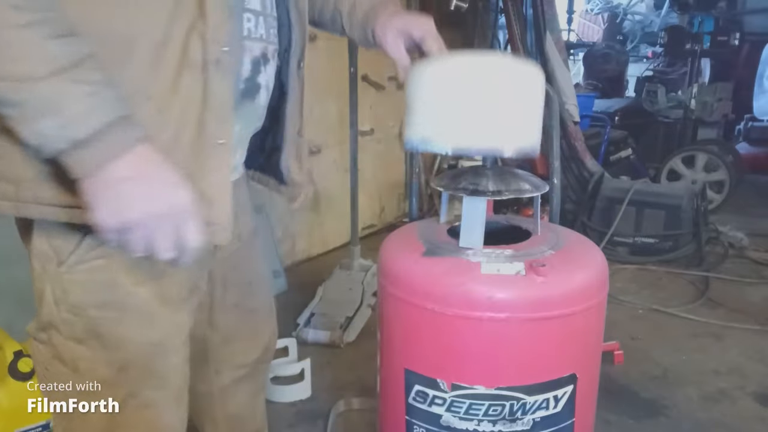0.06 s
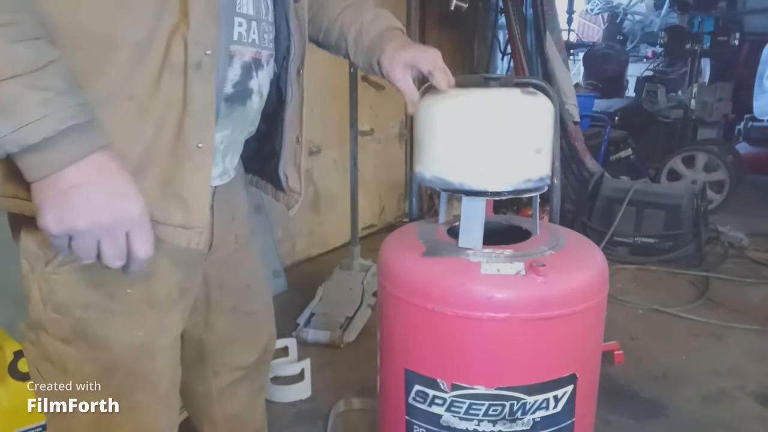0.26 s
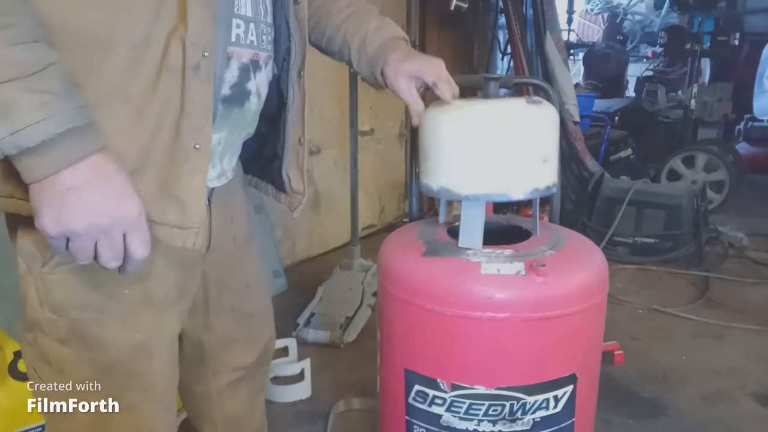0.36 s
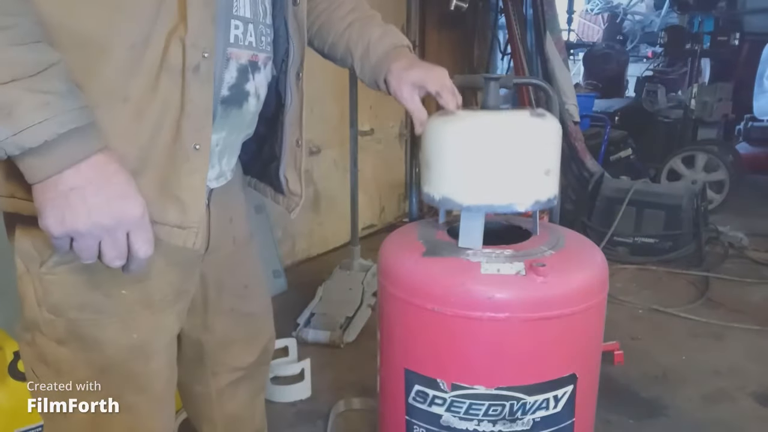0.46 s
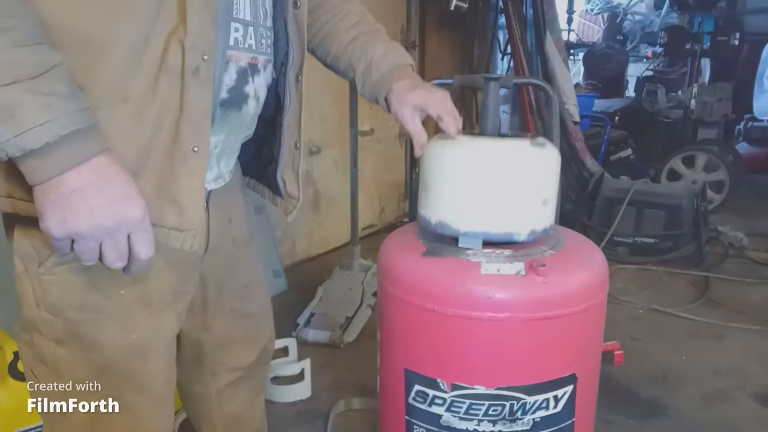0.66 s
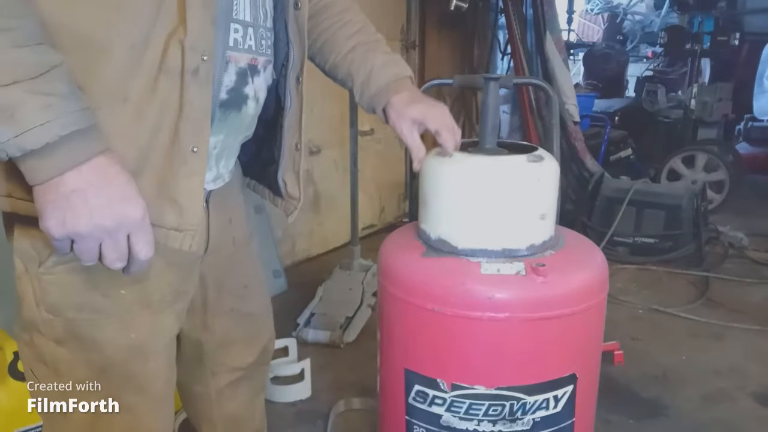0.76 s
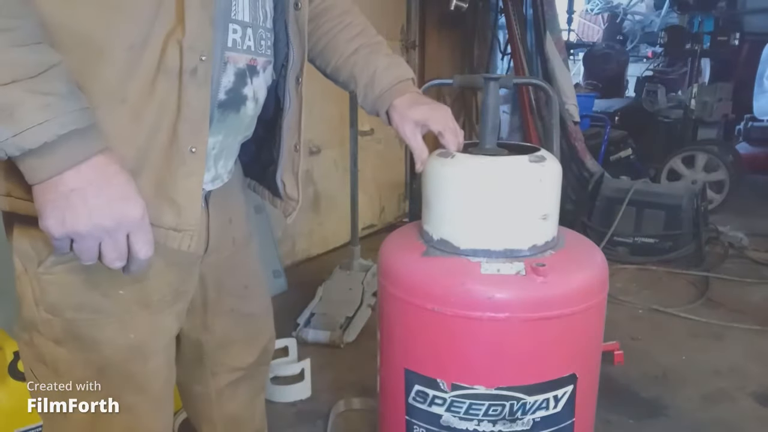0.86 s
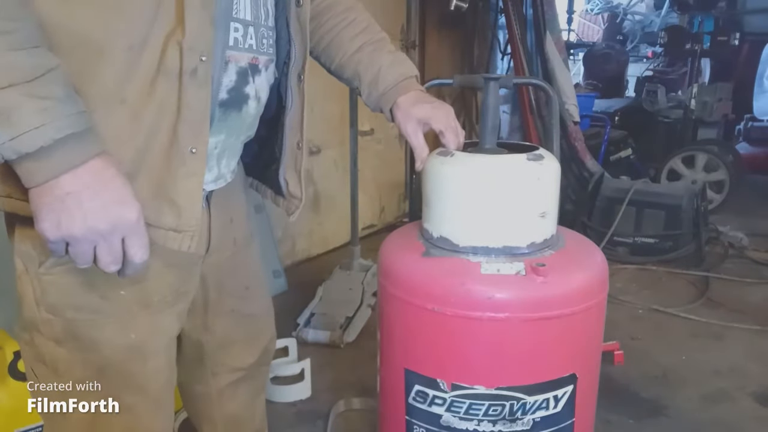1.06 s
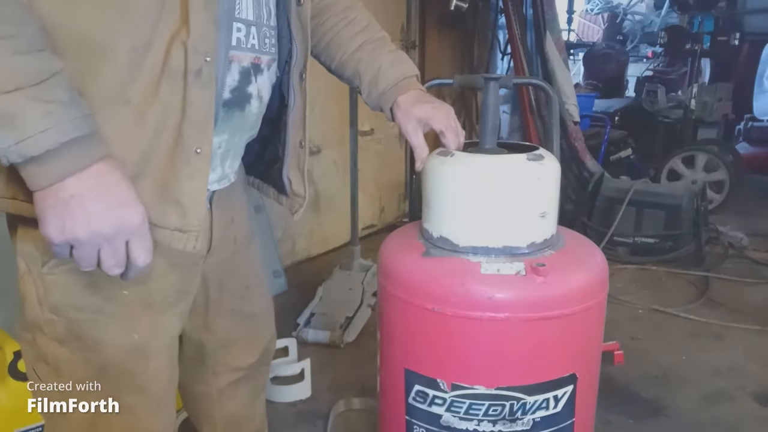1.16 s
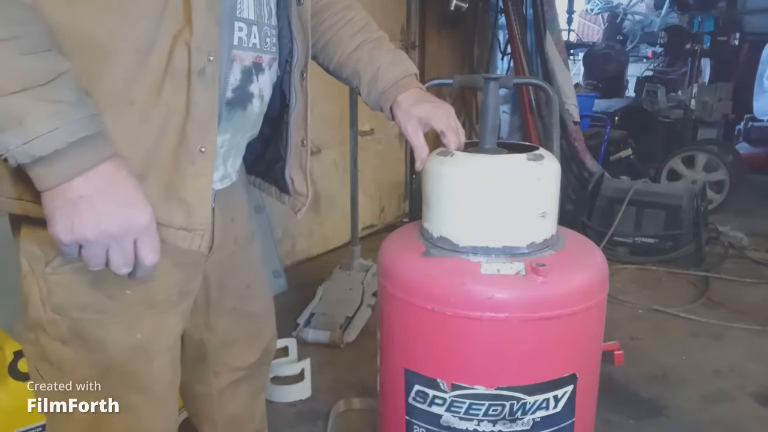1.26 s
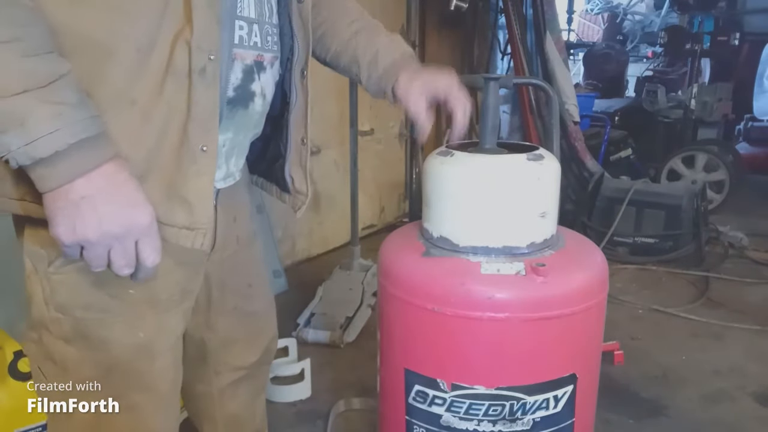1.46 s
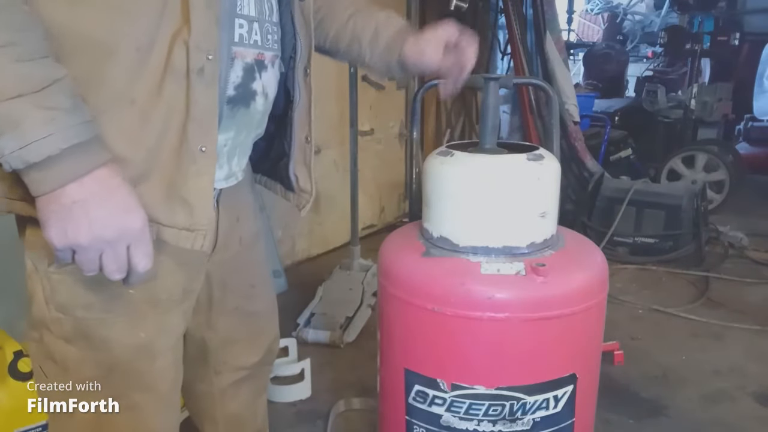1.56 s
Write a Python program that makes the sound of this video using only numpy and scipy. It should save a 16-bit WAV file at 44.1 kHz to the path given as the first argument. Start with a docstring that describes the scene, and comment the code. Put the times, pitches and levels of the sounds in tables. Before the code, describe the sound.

Loud clanging of a thin metal cover knocked on a frame and set down on a steel tank

```python
"""Sheet-metal cover set down on a steel tank

In a garage a cover clanks against the frame and rings on, then lands on the tank, rocks, scrapes and settles;
fingers brush it as they leave. Blows ring damped sines, noise shimmer and faint close modes; the tank adds low
modes and dull thuds, the rim bright noise. Under them lie a brief hum and garage hiss. A limiter holds clanks down.
"""
import sys
import numpy as np
from scipy import signal
from scipy.fft import rfft, irfft, next_fast_len
from scipy.io import wavfile
from scipy.ndimage import uniform_filter1d, minimum_filter1d

SR = 44100
rng = np.random.default_rng(int(sys.argv[2]) if len(sys.argv) > 2 else 0)


def transcribe(u):
    """Save the signal u as a 16-bit wav file named by the first command-line argument.

    u: samples, shape (n,) or (channels, n), limited to [-1, 1]; the rate is SR.
    q: integer samples, one column per channel.
    """
    v = np.clip(np.atleast_2d(u).T, -1, 1)
    q = np.round(v * 32767).astype(np.int16)
    wavfile.write(sys.argv[1], SR, q)


N = 70560
TIME = np.arange(N) / SR  # s

# Garage hiss, spectrum shape: pitch_hz, density_db (per Hz, relative)
GARAGE_SPECTRUM = [(40, -42), (150, -13), (400, -2.5), (1000, -2), (2000, -8), (4000, -8), (8000, -20),
                   (16000, -18.5)]
GARAGE_DB = -72  # rms

# Soft low partials: pitch_hz, level_db (peak, before the fade)
HUM_PARTIALS = [(76, -59), (152, -65)]
HUM_START_S, HUM_END_S, HUM_FADE_DB_PER_S = .275, .64, 32

# Dull bumps through the tank: start_s, level_db (before the envelope)
THUDS = [(0.237, -56.5), (0.827, -40.5), (.91, -65), (1.0, -45.5), (1.129, -44.5)]
THUD_HZ, THUD_T60_S = 164.3, 0.066

# Tank modes: pitch_hz
TANK_HZ = [287, 394, 468, 501, 545, 593, 614, 621, 632, 847]
# The same modes: level_db (relative), t60_s
TANK_MODES = [(-4, 0.71), (-34.5, 6.5), (-28, 4.8), (-19.5, 6), (-15, 0.12), (-12, 2.5), (-5, 2.5),
              (-1.5, 0.6), (0.5, 0.85), (-17, 2.25)]

# Fingers brushing the cover: start_s, length_s, tones_db, hiss_db
BRUSHES = [(1.306, 0.031, -71, -63.5), (1.414, 0.14, -53, -67.5)]
# Thin tones they wake: pitch_hz
THIN_HZ = [3219, 3601, 3978, 4204, 4576, 4727, 4899, 5087, 5313, 5895, 6977, 7434, 10691, 11687]
# The same tones: level_db (relative), t60_s
THIN_MODES = [(-3, 0.83), (-5, 0.39), (8, 0.31), (2.5, 1.1), (0, 0.55), (0, .4), (7, 0.18), (0, .4),
              (-16, .4), (5, 0.17), (-5, .3), (-4, .3), (-5, 0.35), (-15, .3)]

# Bright chatter of rim on steel: time_s, level_db
SCRAPE_LEVEL = [(.233, -61), (0.237, -20.5), (0.249, -22), (0.26, -48.5), (.28, -27), (.33, -39),
                (.385, -50.5), (.42, -80), (0.825, -96.5), (.828, -40), (.87, -52), (.9, -68.5),
                (0.919, -26.5), (0.969, -39), (1.0, -42), (1.04, -43.5), (1.081, -38), (1.115, -41.5),
                (1.146, -48.5), (1.19, -57.5), (1.22, -64)]
# Its spectrum shape: pitch_hz, density_db (per Hz, relative)
GRIT_SPECTRUM = [(2940, -11.5), (5000, 10), (7380, -3), (8620, -4.5), (15200, -5.5), (16000, -16.5)]
GRIT_WIDTH_HZ, GRIT_SCATTER_DB = 60, 6  # spacing and spread of the random peaks

# Knocks on the frame while the cover hangs in the hand: start_s, level_db
KNOCKS = [(.2345, -19), (.241, -18), (.2687, -19.5), (.293, -16), (.3211, -22), (.358, -38.5), (.395, -37)]
# Contacts as it lands and rocks: start_s, level_db, tank_level_db
LANDINGS = [(.8258, -18, -28.5), (.838, -19, -70), (.8758, -17.5, -42), (.905, -11.5, -15.5),
            (.955, -19.5, -33), (.98, -31, -47), (1.03, -26, -29.5), (1.08, -36.5, -26.5),
            (1.112, -37.5, -60), (1.14, -40.5, -37.5), (1.175, -49, -39), (1.197, -62, -30)]
REBOUND_DB = -6  # main modes in every blow after the first
CONTACT_T60_S, ATTACK_S, SWELL_S = 0.016, 0.00045, 0.0011  # rough push; rise constants of modes and shimmer

# Cover and frame ringing free: pitch_hz
HANGING_HZ = [398, 511, 594, 615, 739, 768, 846, 947, 996, 1027, 1167, 1351, 1393, 1448, 1674, 1997, 2083,
              2271, 2654, 2893, 2941, 3025, 3205, 3425, 3531, 3732, 3894, 4544, 5136, 5760, 6875]
# The same modes: level_db (relative to the blow), t60_s
HANGING_MODES = [(-13.5, 3.4), (-25.5, 2.4), (-2.5, 1.37), (-8, 1.264), (-17, 3), (-12.5, 1.51), (-19, 4.4),
                 (0, 0.18), (7, 0.2), (-11, 0.67), (-12.5, 2.03), (-15.5, 1), (-5.5, 1.1), (-15.5, 0.78),
                 (-12.5, 1.23), (-13.5, 0.86), (-26.5, .25), (-13, 4.4), (-2.5, 0.34), (0, 0.44),
                 (-19, 3.25), (4.5, .4), (-7, 0.71), (-18, 1.17), (-36.5, 0.2), (-15.5, .4), (0.5, 0.66),
                 (-0.5, 0.33), (-25.5, 1.2), (-9, 0.28), (-12, 0.12)]
# Cover resting on its seat: pitch_hz
SEATED_HZ = [678, 770, 877, 1017, 1081, 1139, 1174, 1277, 1335, 1395, 1459, 1674, 1707, 1752, 1830, 2019,
             2268, 2652, 2880, 2941, 3203, 3418, 3596, 3908, 4134, 4285, 5050, 5566]
# The same modes: level_db (relative to the blow), t60_s
SEATED_MODES = [(-22, 0.71), (2, 1.3), (-11, 0.77), (-40, 3.3), (1, 0.25), (-10.5, 0.93), (-16.5, 1.23),
                (-10.5, 0.98), (-18.5, 2.15), (-12, 0.2), (-12, 1.2), (-19, 2.9), (-4, 0.9), (-19, 0.21),
                (-20, 1.5), (-11.5, 0.84), (-8, 0.87), (-8, 0.62), (-14.5, 0.6), (-3.5, 0.31), (-13, 0.95),
                (-19, 0.29), (-21.5, 0.9), (-24, 0.35), (-26, 0.15), (-13.5, 0.53), (-13, 0.1), (-31, 0.1)]
SEATED_STOP_T60_S = 0.083  # how fast the free ring dies once the cover has landed

# Crowd of close sheet modes, hanging free: pitch_hz, density_db (per Hz, relative)
SHEET_FREE = [(88, -66), (150, -10), (514, -9), (601, 3), (941, -1.5), (1560, -2), (2980, -3.5), (3490, 5),
              (3770, 1.5), (16000, -45)]
# The same, seated: pitch_hz, density_db (per Hz, relative)
SHEET_SEATED = [(88, -32), (150, -14.5), (774, 2), (1420, -3.5), (1560, -9), (1760, -1), (2760, -6),
                (3620, -0.5), (8560, -33), (16000, -53.5)]
# Shimmer decay, hanging free: pitch_hz, t60_s
FREE_T60 = [(200, 0.1), (600, .7), (2000, 0.5), (5000, 0.36), (9000, 0.24), (15000, 0.45)]
# Shimmer decay, seated: pitch_hz, t60_s
SEATED_T60 = [(200, 0.65), (450, 0.64), (900, 0.88), (2000, 0.57), (5000, 0.53), (9000, 0.22),
              (15000, 0.11)]
SHEET_FREE_DB, SHEET_SEATED_DB = 2.5, 1.5  # shimmer, relative to the blow
SHEET_WIDTH_HZ, SHEET_SCATTER_DB = 35, 4  # spacing and spread of its random peaks
CROWD_FREE_DB, CROWD_SEATED_DB, CROWD_SCATTER_DB = 9, 0.5, 6.5  # faint close modes
CROWD_LIFE = 0.57  # t60 of the faint modes over that of the shimmer

# Tones already lingering at the start: pitch_hz, level_db (rms, 1/7 s before the start)
LINGER = [(393, -78), (629.8, -64), (888, -85), (1163, -83), (1674, -63), (2272, -71), (2939, -67),
          (3898, -90)]
LINGER_T60_S = 20

LOW_CUT_HZ, TOP_HZ = 302, 16450
LIMIT_DB, RELEASE_DB_PER_S, LOOK_AHEAD_S = -5.5, 51, .002


def amp(db):
    """Decibels to linear gain."""
    return 10 ** (np.asarray(db) / 20)


def unit(x):
    """x scaled to rms 1."""
    return x / np.sqrt(np.mean(x ** 2) + 1e-20)


def along(points, hz):
    """Value at hz between (Hz, value) points on a log pitch axis."""
    f, v = np.transpose(points)
    return np.interp(np.log(hz + 1), np.log(f + 1), v)


def filtered(x, response):
    """x times a response of frequency."""
    m = next_fast_len(N + SR // 2)  # padding for the filter's tail
    return irfft(rfft(x, m) * response(np.fft.rfftfreq(m, 1 / SR)), m)[:N]


def hiss(spectrum):
    """Coloured noise of rms 1."""
    return unit(filtered(rng.standard_normal(N), lambda hz: amp(along(spectrum, hz))))


def uneven(x, width_hz, scatter_db):
    """x through narrow random peaks and dips, drawn anew each time, rms 1."""
    knots = scatter_db * rng.standard_normal(1000)
    return unit(filtered(x, lambda hz: amp(np.interp(hz / width_hz, np.arange(1000), knots))))


def fade(t, t60):
    """Exponential decay, 60 dB down after t60 seconds."""
    return amp(-60 * t / np.maximum(t60, .002))


def table(hz, rest):
    """Pitches joined with their levels and decays."""
    return np.column_stack([hz, rest])


def ring(modes, t):
    """Damped sines starting together with a soft attack."""
    hz, db, t60 = np.transpose(modes)[..., None]
    tones = amp(db) * fade(t, t60) * np.sin(2 * np.pi * hz * t)
    return (1 - np.exp(-t / ATTACK_S)) * np.sum(tones, axis=0)


def add_at(out, start_s, sound):
    """Mixes sound into the double-length out from start_s."""
    out[round(start_s * SR):][:N] += sound


def garage():
    """Steady coloured hiss of the garage."""
    return amp(GARAGE_DB) * hiss(GARAGE_SPECTRUM)


def hum():
    """Two soft low partials that swell, fade and stop."""
    on = 1.0 * (TIME > HUM_START_S) * (TIME < HUM_END_S)
    gate = uniform_filter1d(on, size=SR // 15)
    falling = amp(-HUM_FADE_DB_PER_S * (TIME - HUM_START_S))
    return gate * falling * sum(amp(db) * np.sin(2 * np.pi * hz * TIME) for hz, db in HUM_PARTIALS)


def thuds():
    """Short low pushes: one quickly rising, quickly damped sine each."""
    out = np.zeros(N)
    for start_s, db in THUDS:
        t = np.maximum(TIME - start_s, 0)
        envelope = (1 - fade(t, THUD_T60_S / 3)) * fade(t, THUD_T60_S)
        out += amp(db) * envelope * np.sin(2 * np.pi * THUD_HZ * t)
    return out


def tank():
    """The landings pass into the tank's long low modes."""
    out, tones = np.zeros(2 * N), ring(table(TANK_HZ, TANK_MODES), TIME)
    for start_s, _, tank_db in LANDINGS:
        add_at(out, start_s, amp(tank_db) * tones)
    return out[:N]


def grit():
    """Bright noise with narrow random peaks and dips, drawn anew each time."""
    return uneven(hiss(GRIT_SPECTRUM), GRIT_WIDTH_HZ, GRIT_SCATTER_DB)


def brushes():
    """A light stroke swells thin tones with a little hiss."""
    out, thin = np.zeros(N), table(THIN_HZ, THIN_MODES)
    for start_s, length_s, tones_db, hiss_db in BRUSHES:
        stroke = np.clip((TIME - start_s) / length_s, 0, 1)
        swell = np.sin(np.pi * stroke / 2) ** 2
        out += amp(tones_db) * swell * ring(thin, np.maximum(TIME - start_s, 0))
        out += amp(hiss_db) * np.sin(np.pi * stroke) * grit()
    return out


def scrape():
    """The rim chatters on steel after each clank and while it is shifted."""
    s, db = np.transpose(SCRAPE_LEVEL)
    return amp(np.interp(TIME, s, db, -120, -120)) * grit()


def shimmer(spectrum, t60):
    """Streaky noise in which each frequency dies at its own speed."""
    streaks = uneven(hiss(spectrum), SHEET_WIDTH_HZ, SHEET_SCATTER_DB)
    hz, t, z = signal.stft(streaks, SR, nperseg=256)
    dying = z * fade(t, along(t60, hz)[:, None])
    return signal.istft(dying, SR, nperseg=256)[1][:N]


def contacts(blows):
    """Each blow as a short rough push of unit energy times its level."""
    force = np.zeros(2 * N)
    for start_s, db in blows:
        push = fade(TIME, CONTACT_T60_S) * rng.standard_normal(N)
        add_at(force, start_s, amp(db) * push / np.linalg.norm(push))
    return force[:N]


def crowd(spectrum, t60, count):
    """Many weak modes scattered over the band, start power 1."""
    jitter, scatter = rng.random(count), rng.standard_normal(count)
    hz = 300 + 9000 * ((np.arange(count) + jitter) / count) ** 1.5
    # modes lie wider apart higher up, so each carries more of the spectrum
    db = along(spectrum, hz) + 5 * np.log10(hz) + CROWD_SCATTER_DB * scatter
    db -= 10 * np.log10(np.sum(amp(2 * db)) / 2)
    return ring(np.transpose([hz, db, CROWD_LIFE * along(t60, hz)]), TIME)


def struck(blows, modes, sheet, t60, sheet_db, crowd_db):
    """Every blow rings the main modes, later ones less; its rough contact wakes weak modes and adds shimmer."""
    out, tones = np.zeros(2 * N), ring(modes, TIME)
    for k, (start_s, db) in enumerate(blows):
        wash = amp(sheet_db) * (1 - np.exp(-TIME / SWELL_S)) * shimmer(sheet, t60)
        add_at(out, start_s, amp(db) * (amp(REBOUND_DB * (k > 0)) * tones + wash))
    weak = amp(crowd_db) * signal.fftconvolve(contacts(blows), crowd(sheet, t60, count=200))
    return out[:N] + weak[:N]


def cover():
    """The hanging sheet rings free until landing stops it, then the seated sheet rings with modes of its own."""
    stop = fade(np.maximum(TIME - LANDINGS[0][0], 0), SEATED_STOP_T60_S)
    hanging = table(HANGING_HZ, HANGING_MODES)
    free = struck(KNOCKS, hanging, SHEET_FREE, FREE_T60, SHEET_FREE_DB, CROWD_FREE_DB)
    lingering = [(hz, db, LINGER_T60_S) for hz, db in LINGER]
    linger = np.sqrt(2) * ring(lingering, TIME + 1 / 7)  # rms to peak; already under way
    landings = [row[:2] for row in LANDINGS]
    resting = table(SEATED_HZ, SEATED_MODES)
    seated = struck(landings, resting, SHEET_SEATED, SEATED_T60, SHEET_SEATED_DB, CROWD_SEATED_DB)
    return stop * (free + linger) + seated


def low_cut(hz):
    """Fourth-order low cut: keeps the low end of the metal sounds thin."""
    ratio = 1j * hz / LOW_CUT_HZ
    return (ratio / (1 + ratio)) ** 4


def scene():
    """Background, tank, handling and cover mixed to one channel."""
    metal = filtered(cover() + tank(), low_cut)
    return (garage() + hum() + thuds() + brushes() + scrape() + metal)[None]


def record(dry):
    """A look-ahead limiter with a steady recovery, then the band limit."""
    over_db = np.maximum(20 * np.log10(np.abs(dry[0]) + 1e-9) - LIMIT_DB, 0)
    ahead = max(int(LOOK_AHEAD_S * SR), 2)
    held = -minimum_filter1d(-over_db, size=ahead, origin=-(ahead // 2))  # largest excess just ahead
    recovery = RELEASE_DB_PER_S * TIME
    cut_db = np.maximum.accumulate(held + recovery) - recovery
    limited = dry[0] * amp(-uniform_filter1d(cut_db, size=64))
    return filtered(limited, lambda hz: hz < TOP_HZ)[None]


dry = scene()
out = record(dry)
transcribe(out)
```